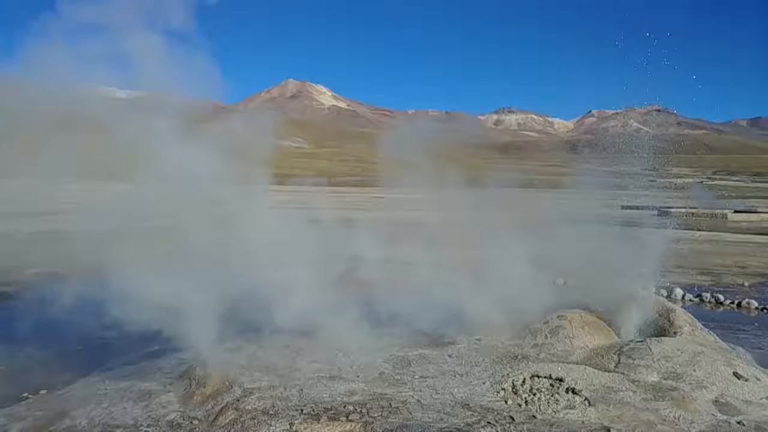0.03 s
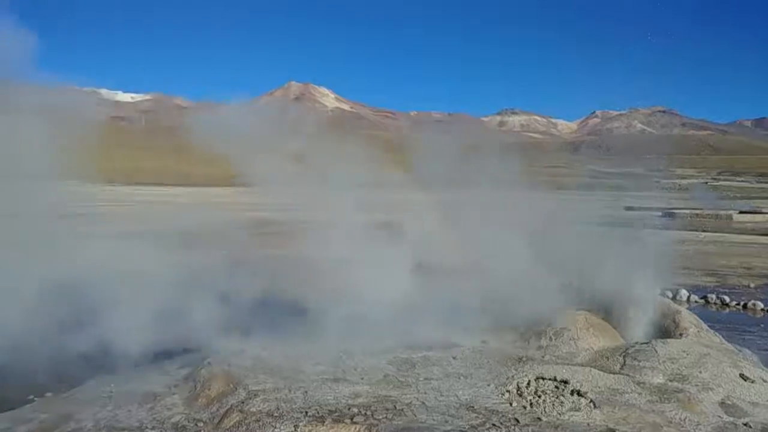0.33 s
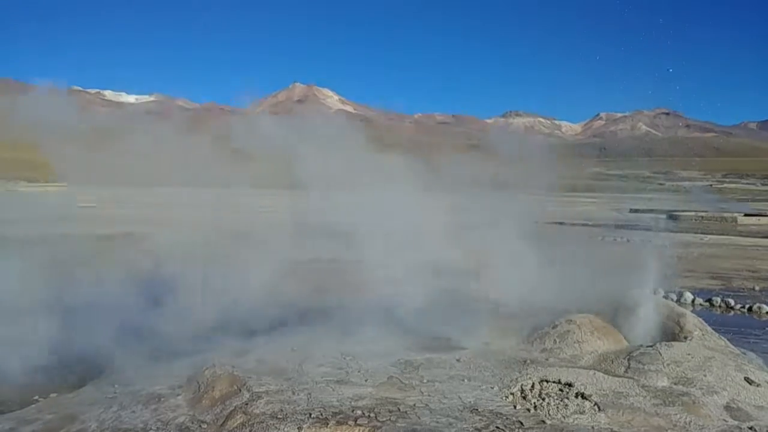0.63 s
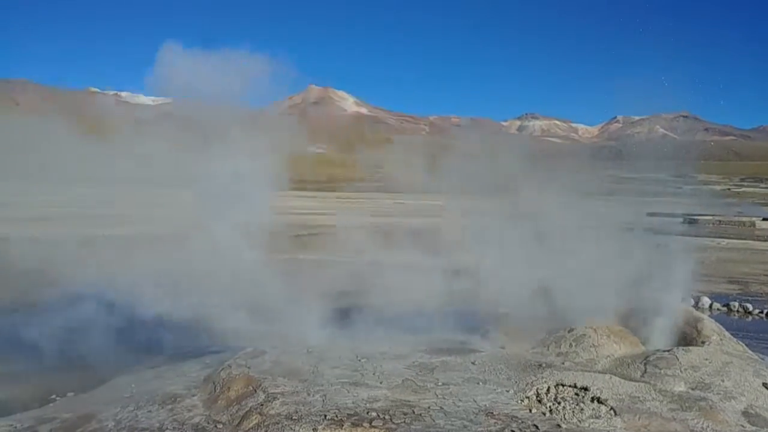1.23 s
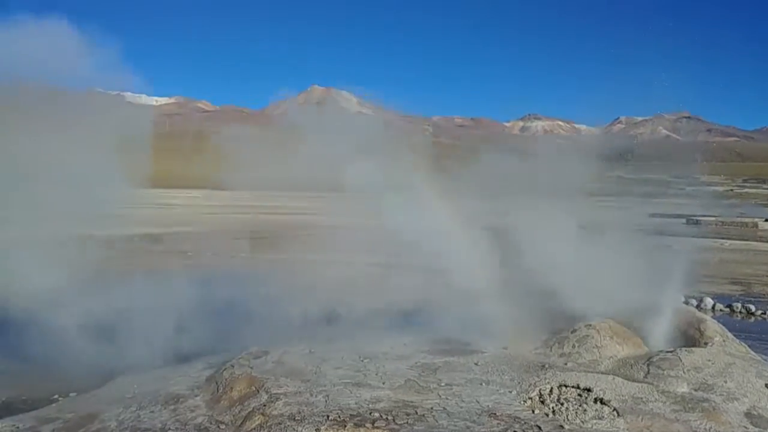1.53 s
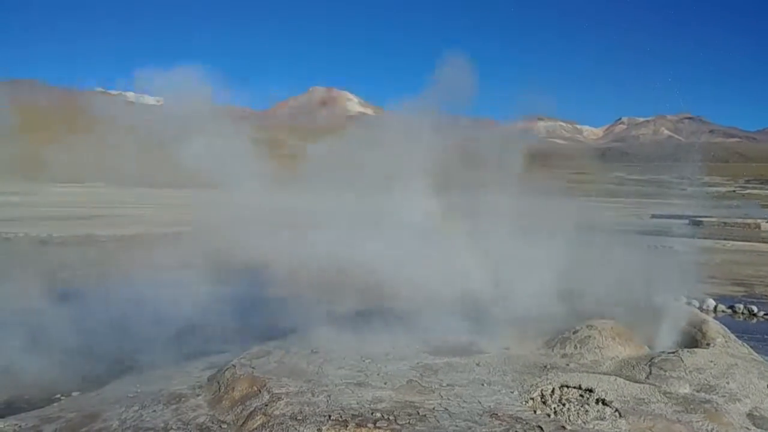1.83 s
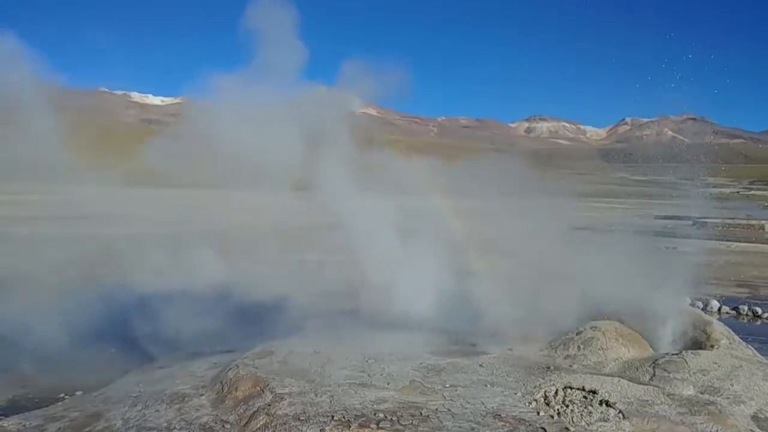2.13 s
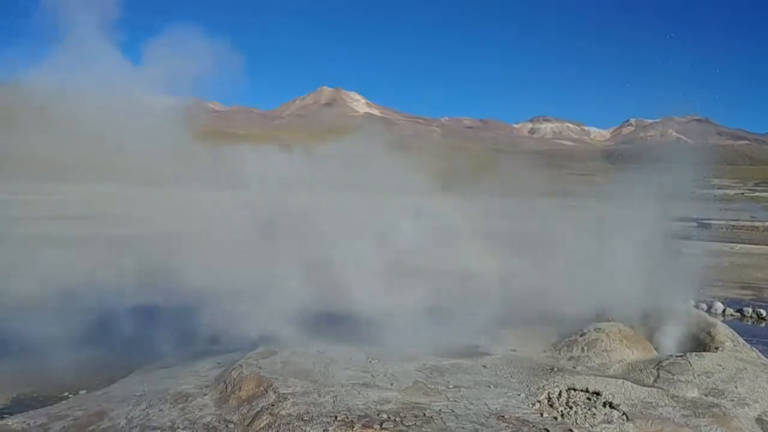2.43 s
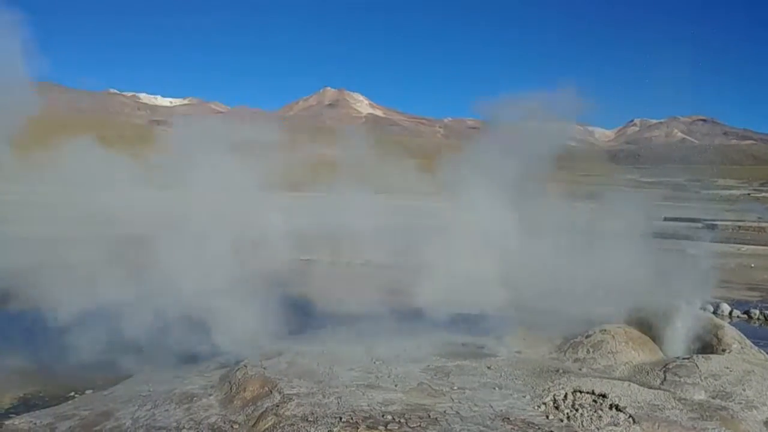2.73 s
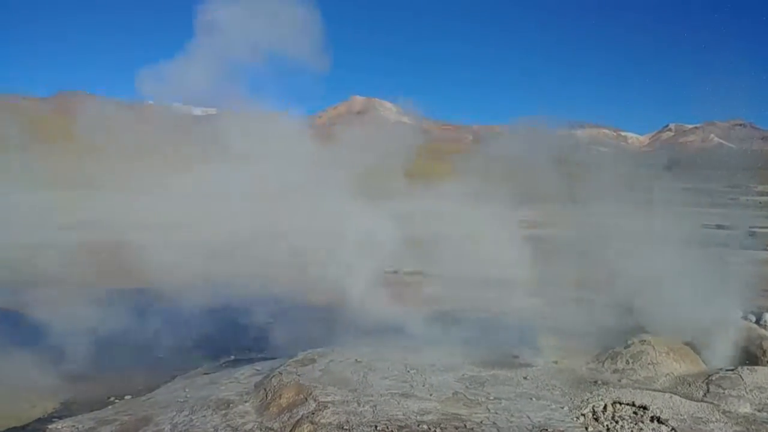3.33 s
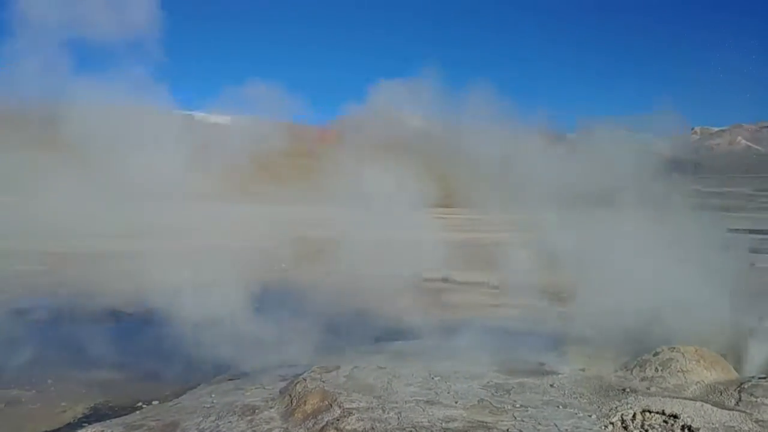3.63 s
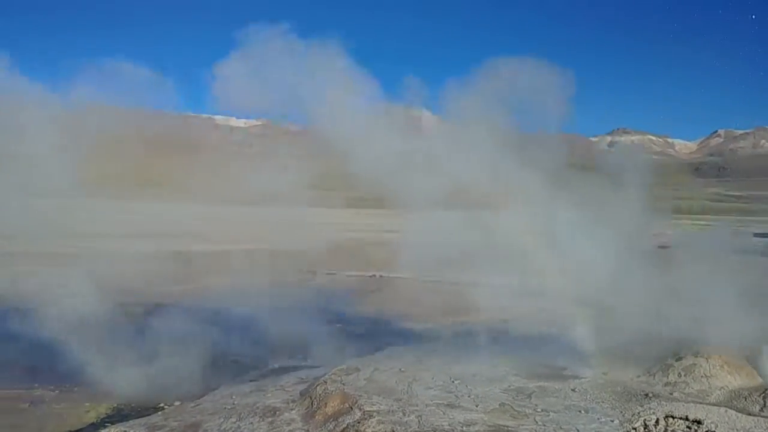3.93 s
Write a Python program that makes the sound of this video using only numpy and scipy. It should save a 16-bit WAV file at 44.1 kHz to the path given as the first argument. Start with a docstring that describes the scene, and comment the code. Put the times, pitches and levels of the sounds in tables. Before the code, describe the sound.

Venting steam hisses and sputters unevenly to the left, outdoors on a windy geothermal plain. Wind rumbles and flutters heavily against both sides of the microphone, and the steam weakens just before the end.

```python
"""An open, windy geothermal field with steam venting on the left.
The turbulent jet makes a hollow, sputtering roar under a hiss that surges with the flow and sinks
near the end. Wind buffets each side of the microphone separately, with a deep rumble and a lighter
flutter, and its strongest eddies overload it. The right side fades in over the first second."""
import sys
import numpy as np
from scipy import signal
from scipy.fft import rfft, irfft
from scipy.io import wavfile
from scipy.ndimage import uniform_filter1d

SR = 44100
rng = np.random.default_rng(int(sys.argv[2]) if len(sys.argv) > 2 else 0)


def wav_out(sig):
    """Save sig, one row per channel (or a flat mono array), as 16-bit PCM at SR to the path in sys.argv[1]."""
    wavfile.write(sys.argv[1], SR, np.round(np.clip(np.atleast_2d(sig).T, -1, 1) * 32767).astype(np.int16))


N = 176400


def from_db(db):
    """Amplitude grows tenfold for every 20 decibels."""
    return 10 ** (np.asarray(db) / 20)


def unit_rms(x):
    """Dividing by the root mean square gives a signal unit power."""
    return x / np.sqrt(np.mean(x ** 2) + 1e-20)


def in_time(rows):
    """Linear interpolation gives each column after the time column a value at every sample."""
    seconds, *columns = np.transpose(rows)
    return [np.interp(np.arange(N) / SR, seconds, column) for column in columns]


def drift(corner_hz):
    """Noise through a two-pole low-pass wanders smoothly, with a spread of 1."""
    step, settling = 20, 4000   # samples per slow step; slow steps for the filter to settle
    pole = np.exp(-2 * np.pi * corner_hz * step / SR)
    white = rng.standard_normal(N // step + settling + 2)
    slow = signal.lfilter([1], [1, -2 * pole, pole * pole], white)[settling:]
    return np.interp(np.arange(N) / step, np.arange(len(slow)), unit_rms(slow))


def noise(spectrum):
    """Spectral shaping colours white noise, at unit power; it falls away beyond the given band."""
    hz, db = np.transpose(spectrum)
    log_f = np.log(np.maximum(np.fft.rfftfreq(N, 1 / SR), 1))
    outside_band = np.maximum(np.log(hz[0]) - log_f, 0) + np.maximum(log_f - np.log(hz[-1]), 0)
    gain = from_db(np.interp(log_f, np.log(hz), db) - 40 * outside_band)
    return unit_rms(irfft(rfft(rng.standard_normal(N)) * gain, N))


def steady(x, window_s=0.06):
    """Dividing by the running rms evens out slow swells and keeps quick fluctuations."""
    return x / np.sqrt(uniform_filter1d(x ** 2, int(window_s * SR)) + 1e-9)


def wind():
    """Turbulent pressure: each side has its own eddies; small ones flutter most as the rumble peaks."""
    # Each row: time in seconds, relative level in dB.
    rumble_levels = [(0.24, -28.5), (0.52, -15), (0.68, -20.5), (0.71, -10.5), (0.75, -16.5), (0.88, -14.5),
                     (1.66, -13), (1.72, -16), (1.84, -9), (1.89, -17), (1.92, -14), (2.1, -13),
                     (2.16, -18.5), (2.19, -12.5), (2.42, -15), (2.82, -12), (2.92, -15.5), (2.95, -11),
                     (3.3, -14.5), (3.42, -11), (3.51, -15.5), (3.56, -9), (3.62, -15.5), (3.85, -14.5),
                     (3.86, -11.5), (3.98, -11)]
    flutter_levels = [(0.24, -33.5), (0.41, -28.5), (0.67, -33.5), (0.69, -27), (1.76, -23.5), (1.79, -31),
                      (1.82, -19.5), (1.94, -29), (2.32, -25), (3.6, -25.5), (3.67, -33), (3.87, -23.5),
                      (3.94, -35), (3.98, -30)]
    # Where the wind presses. Each row: time in seconds, left minus right level in dB.
    balance = [(.23, 5), (.45, 6.5), (.6, 0.5), (.72, 5), (.9, -0.5), (1.25, -3.5), (2.0, -1), (2.7, -5),
               (3.4, -3), (3.6, -2), (3.75, -3), (3.86, 10.5), (4.0, -11)]
    # Large and small eddies. Each row: frequency in Hz, relative spectral density in dB.
    rumble_spectrum = [(15, -37.5), (33, -32.5), (45, -21), (62, -3.5), (88, .5), (120, -1), (180, -3.5),
                       (260, -10), (350, -17), (480, -25), (700, -48.5), (1200, -70.5)]
    flutter_spectrum = [(150, -14.5), (300, 0.5), (420, 1), (540, -2.5), (700, -14.5), (1000, -27),
                        (1300, -40.5), (2000, -48), (4000, -52), (9000, -62), (16000, -58)]
    rumble_db, = in_time(rumble_levels)
    flutter_db, = in_time(flutter_levels)
    balance_db, = in_time(balance)
    sides = []
    for lean in (from_db(balance_db), from_db(-balance_db)):
        rumble = steady(noise(rumble_spectrum))
        rumble_envelope = unit_rms(np.abs(signal.hilbert(rumble)) + 0.61)
        flutter = steady(noise(flutter_spectrum) * rumble_envelope * from_db(2 * drift(corner_hz=18)))
        buffeting = from_db(rumble_db + 0.5) * rumble + from_db(flutter_db - 4.5) * flutter
        share = 2 * lean / np.sqrt(1 + lean ** 2)   # the two sides keep a constant total power
        sides.append(share * buffeting)
    return np.array(sides)


def steam():
    """Jet noise: one unsteady flow modulates the amplitude of a roar, a hiss and its treble."""
    # Each row: time in seconds, relative level of the roar in dB.
    roar_levels = [(0.24, -41.5), (0.44, -37), (0.46, -43), (0.74, -40), (0.77, -44), (0.78, -41.5),
                   (1.23, -34.5), (1.24, -40), (1.43, -31), (1.45, -47.5), (1.5, -32.5), (1.81, -40.5),
                   (2.31, -39), (2.36, -34), (2.62, -36), (2.71, -46), (2.81, -32.5), (2.85, -44),
                   (2.97, -42), (3.09, -35), (3.14, -39.5), (3.44, -33.5), (3.72, -46.5), (3.8, -37),
                   (3.96, -49.5), (3.98, -48)]
    # Each row: time in seconds, relative level of the hiss in dB, that of its treble in dB.
    hiss_levels = [(0.24, -48.5, -48), (0.4, -46, -46), (0.51, -51, -50), (0.59, -49, -47.5),
                   (0.63, -54, -50), (0.78, -51, -51), (0.8, -48, -43), (0.9, -50, -51), (1.04, -44, -43),
                   (1.1, -47.5, -47.5), (1.19, -45.5, -44.5), (1.24, -53, -54), (1.28, -48.5, -47),
                   (1.4, -45.5, -48), (1.44, -49, -48.5), (1.52, -43, -49.5), (1.56, -49, -50.5),
                   (1.6, -43.5, -43.5), (1.66, -44, -50), (1.69, -46.5, -45), (1.76, -52, -49),
                   (1.94, -50, -48.5), (1.98, -45, -47.5), (2.0, -47, -48), (2.2, -50, -50),
                   (2.4, -46.5, -47), (2.48, -49.5, -52), (2.56, -47.5, -47.5), (2.74, -54.5, -54),
                   (2.75, -49.5, -50), (3.0, -51.5, -49), (3.03, -51, -52), (3.06, -46, -41.5),
                   (3.17, -51.5, -53.5), (3.2, -46.5, -46), (3.27, -48.5, -48.5), (3.3, -45, -43),
                   (3.34, -47, -48.5), (3.55, -46, -42.5), (3.58, -54, -52.5), (3.62, -51, -52),
                   (3.71, -56.5, -57.5), (3.77, -46, -50), (3.85, -50.5, -49.5), (3.95, -61.5, -61),
                   (3.98, -58.5, -58)]
    # Broad resonances of the steam. Each row: frequency in Hz, relative spectral density in dB.
    roar_spectrum = [(170, -7.5), (235, 8), (290, 12), (350, -5.5), (440, 7), (530, 5), (610, -1),
                     (700, -7.5), (780, -4), (870, 0), (1000, -1), (1200, -11.5), (1530, -13.5),
                     (1780, -24), (2400, -41)]
    hiss_spectrum = [(1400, -24), (1800, -14), (2000, -2.5), (2170, -4.5), (2520, 2), (2720, 0), (2930, 2),
                     (3300, -2.5), (3750, -13), (4600, -30)]
    treble_spectrum = [(3200, -19), (3900, -10), (4400, -3), (5050, -1), (5700, -5.5), (6700, -4),
                       (7550, 2.5), (8400, -7.5), (9400, -16.5), (10400, -42.5), (11400, -21),
                       (13800, -18.5), (15700, -10)]
    roar_db, = in_time(roar_levels)
    hiss_db, treble_db = in_time(hiss_levels)
    sputter, surge = drift(corner_hz=100), drift(corner_hz=36)

    def band(spectrum, sputter_db=0, surge_db=0, own_db=0):
        """Shared modulation ties a noise band to the flow; own_db adds independent wavering."""
        carrier = noise(spectrum)
        swing_db = sputter_db * sputter + surge_db * surge + own_db * drift(corner_hz=19)
        return unit_rms(carrier * from_db(swing_db))

    roar = steady(band(roar_spectrum, sputter_db=0.74, surge_db=0.2, own_db=0.9))
    hiss = band(hiss_spectrum, sputter_db=1.03, surge_db=0.78)
    treble = band(treble_spectrum, surge_db=1.1, own_db=1.0)
    return (from_db(roar_db + 13.5) * roar
            + from_db(hiss_db + 6.5) * hiss
            + from_db(treble_db + 6.5) * treble)


def on_the_left(source, far_db=-18, far_cutoff_hz=1350, left_lag_s=0.0003):
    """A level difference places the source: the right is weaker and duller, though slightly earlier."""
    left = np.roll(source, int(left_lag_s * SR))
    low_pass = signal.butter(2, far_cutoff_hz, fs=SR, output="sos")
    right = from_db(far_db) * signal.sosfilt(low_pass, source)
    return np.array([left, right])


def scene():
    """The pressures of wind and steam add by superposition."""
    return wind() + on_the_left(steam())


def record(dry):
    """The sound cuts in, the right fades up, saturation rounds the peaks and a low-pass cuts the top."""
    start_s, opening_s = 0.225, 0.0066
    right_start_db, right_fade_s = -14, 0.81
    cutoff_hz = 15900
    age = np.arange(N) / SR - start_s
    right_gain = from_db(right_start_db * np.clip(1 - age / right_fade_s, 0, 1))
    opened = dry * np.clip(age / opening_s, 0, 1) * np.array([np.ones(N), right_gain])
    saturated = opened / (1 + opened ** 12) ** (1 / 12)   # overload at full scale
    low_pass = signal.ellip(12, 0.1, 90, cutoff_hz, fs=SR, output="sos")
    return signal.sosfilt(low_pass, saturated + 1e-18)


dry = scene()
out = record(dry)
wav_out(out)
```